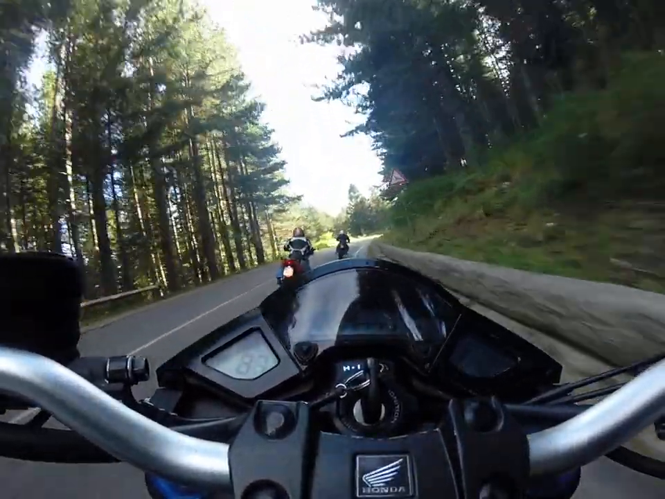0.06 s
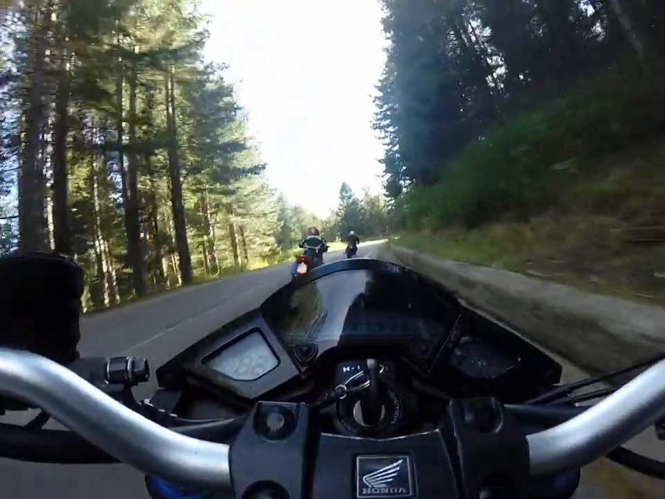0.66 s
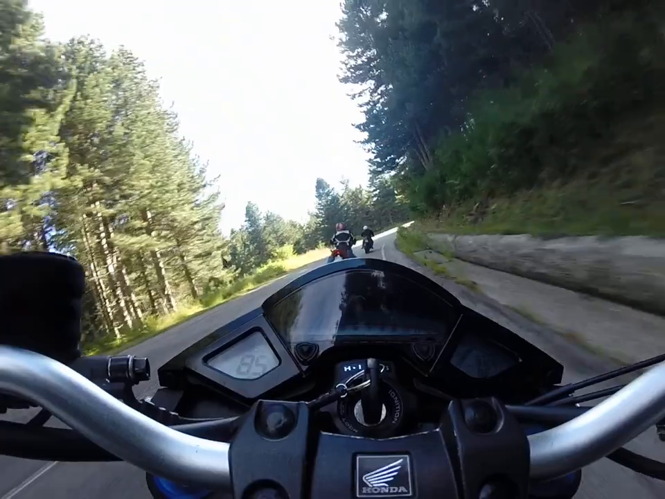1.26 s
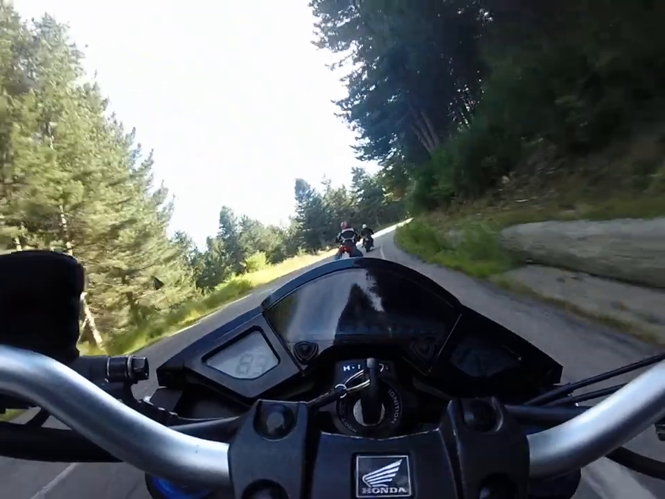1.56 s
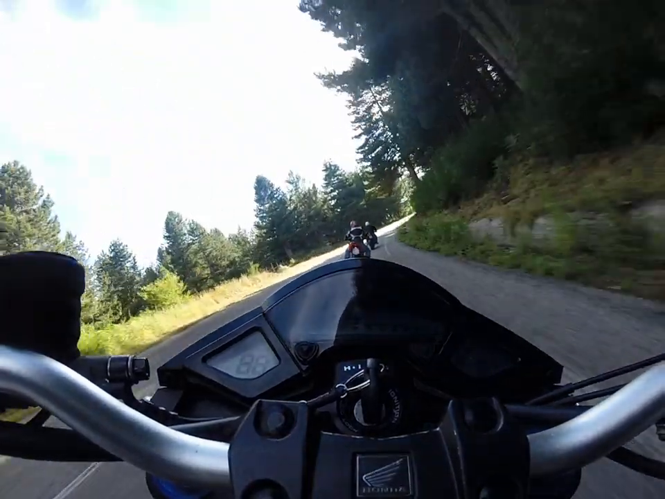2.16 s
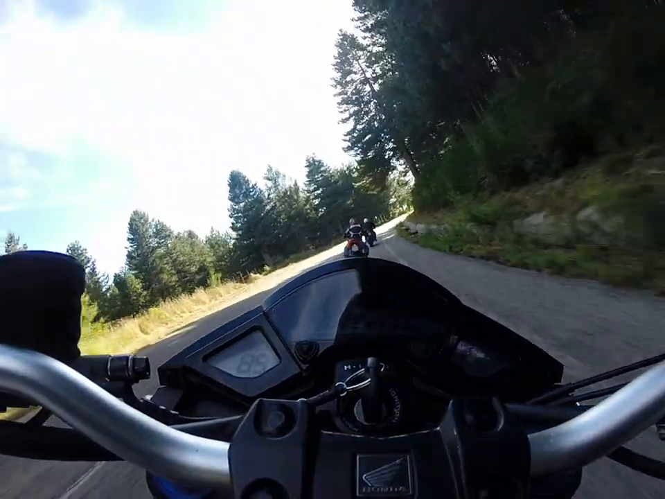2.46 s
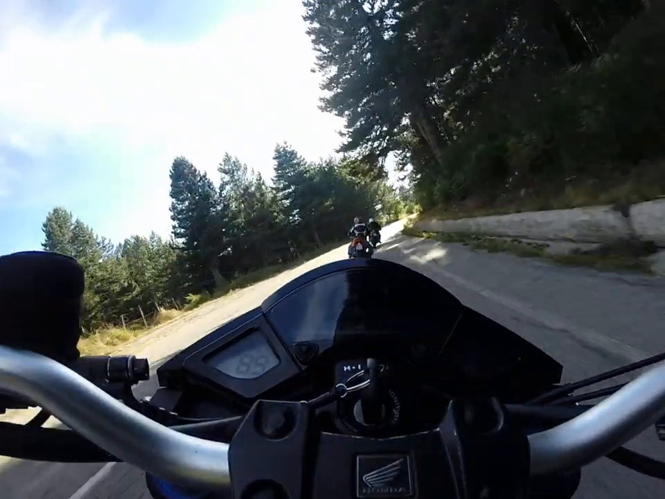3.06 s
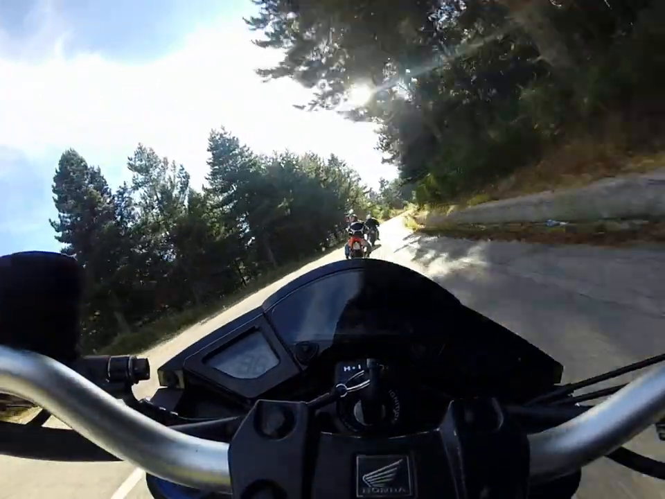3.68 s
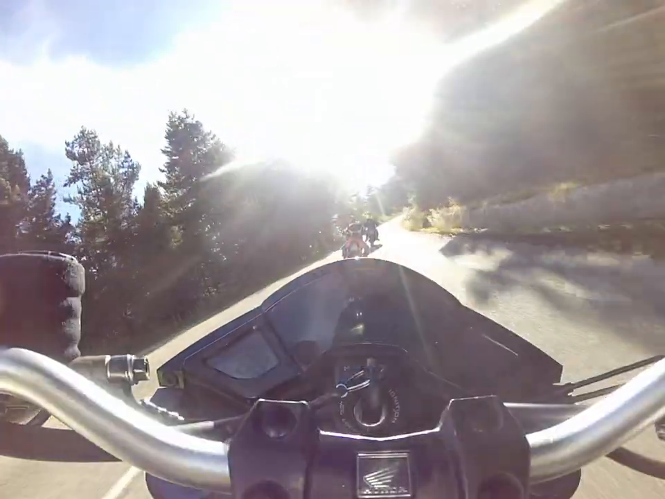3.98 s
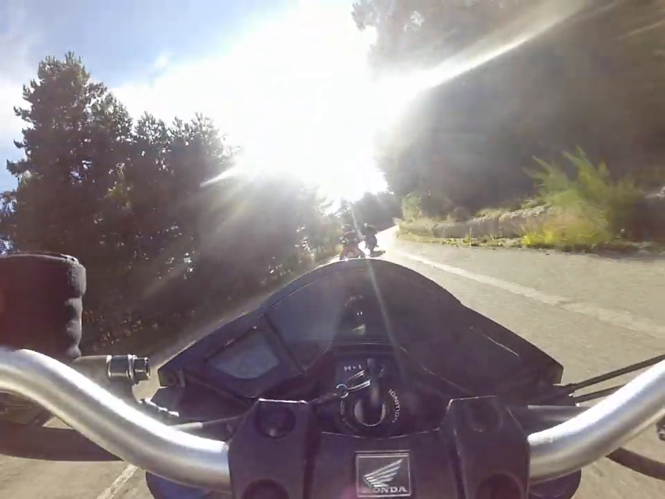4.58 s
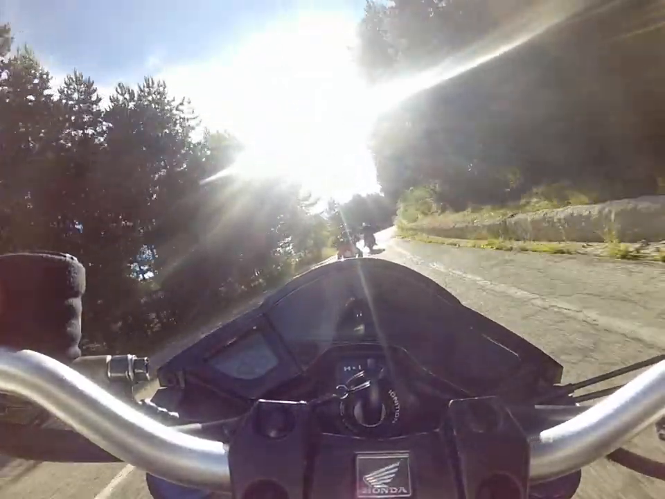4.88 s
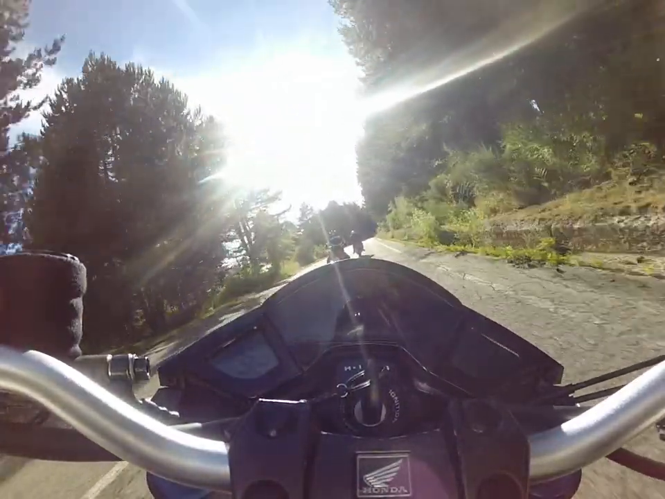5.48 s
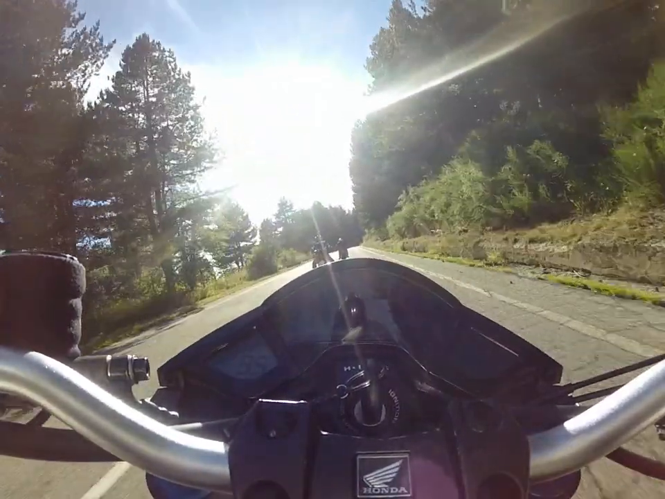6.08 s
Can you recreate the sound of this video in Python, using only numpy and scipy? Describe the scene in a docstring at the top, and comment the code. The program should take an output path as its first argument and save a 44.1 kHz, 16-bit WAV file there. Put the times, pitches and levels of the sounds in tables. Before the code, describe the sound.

A four-cylinder motorcycle runs along a mountain road throughout, heard close from just behind the handlebars. Its strong, booming drone carries a mechanical rasp and brief thin whines. The pitch dips slightly at the start, climbs slowly until about 2.5 seconds and holds, loud and full. It sags around 4.2 seconds, then climbs again to the end, with more throb and a few quick dips in loudness. The rasp swells near 0.4, 2.5, 3.7 and 5 seconds. Wind buffets the microphone with low thumps and a rough hiss, strongest around 0.3 to 0.7, 1.6, 2.5, 4.2 to 4.6 and 6 seconds. From about 3.6 seconds a second motorcycle ahead adds a faint, higher, rising note. Very faint dry ticks come near 3.7 and 5.5 seconds. At about 5.9 seconds a bump makes the plastic fairing knock once, and the engine briefly ducks before swelling back.

```python
"""A four-cylinder motorcycle climbs a mountain road, heard from just behind the handlebars.
The airbox booms at the firing rate; uneven cylinders, exhaust, valve gear and drive add a rasp.
Wind buffets the microphone, a second bike pulls away ahead, and a bump makes the fairing knock."""
import sys
import numpy as np
from scipy.fft import rfft, irfft, next_fast_len
from scipy.io import wavfile
from scipy.ndimage import uniform_filter1d, minimum_filter1d, map_coordinates

SR = 44100
rng = np.random.default_rng(int(sys.argv[2]) if len(sys.argv) > 2 else 0)


def wrap_up_sound(samples):
    """Save the sound to the file named by the first command line argument, as 16-bit audio."""
    columns = np.atleast_2d(samples).T
    # keep every value between -1 and 1, then stretch to whole-number steps
    tamed = np.clip(columns, -1, 1)
    steps = np.round(tamed * 32767).astype(np.int16)
    wavfile.write(sys.argv[1], SR, steps)


N = 279594

# Each row: centre in seconds, half length in seconds, depth in dB.
BOOM_DIPS = [(.215, 0.088, 5.5), (.54, 0.023, 3.5), (1.45, 0.15, 3), (2.65, 0.33, 1.5), (4.49, 0.031, 9),
             (4.86, 0.13, 2.5), (5.33, .07, 2.5), (5.875, 0.027, 5), (5.97, 0.04, 10.5), (6.07, 0.082, 8)]
# Each row: centre in seconds, half length in seconds, bend in Hz.
BOOM_BENDS = [(.205, .05, -7.5), (.68, .05, 6.5), (4.15, 0.061, -5), (4.44, .04, 7.5), (4.5, .04, -4)]
# Each row: time in seconds, level between surges in dB.
THROB_LEVELS = [(.08, -50), (.25, -31), (1.1, -36.5), (2.0, -33.5), (2.5, -42.5), (3.7, -44.5), (4.15, -33),
                (4.6, -37.5), (4.85, -27.5), (6.2, -26.5)]


def airbox(firings, firing_hz, surge_db, gust_db):
    """One near-pure swing per firing, loudest at resonance; unequal cylinders throb at 3/4 the rate."""
    resonance_hz, peak_db = 208.5, -9.5
    below_db_per_hz, above_db_per_hz = 0.09, 0.35
    detune_hz = firing_hz - resonance_hz
    loss_db = np.maximum(-below_db_per_hz * detune_hz, above_db_per_hz * detune_hz)
    boom_db = peak_db - loss_db - swells(BOOM_DIPS)
    shiver_db = amp(gust_db - 6.5) * wobble(35)  # gusts shake the note
    bend_turns = np.cumsum(swells(BOOM_BENDS)) / SR
    boom = np.sqrt(2) * np.sin(2 * np.pi * (firings + bend_turns))
    octave = amp(-26) * tone(2 * firings, waver_db=3.5, smear_rad=0.46, wander_hz=7.4)
    throb_db = curves(THROB_LEVELS)[0] + 1.2 * surge_db
    throb = amp(throb_db) * tone(firings * 3 / 4, waver_db=3.5, smear_rad=0.3, wander_hz=9)
    return amp(boom_db + shiver_db) * (boom + octave) + throb


# Each row: multiple of the firing rate, relative level in dB.
EXHAUST_TONES = [(1.25, 0), (1.5, -3), (1.75, -5), (2.5, -3.5), (2.75, -6), (3, -0.5), (3.25, -13),
                 (3.5, -5)]
# Each row: frequency in Hz, gain in dB.
SILENCER_RESPONSE = [(250, 0), (400, 0), (520, -5.5), (610, 0.5), (660, 7), (700, -2.5), (780, -13.5)]


def exhaust(firings, surge_db):
    """Overtones of the four-firing cycle swell as they pass through the silencer's resonance."""
    tones = sum(amp(db) * tone(multiple * firings, waver_db=2.5, smear_rad=0.23, wander_hz=12)
                for multiple, db in EXHAUST_TONES)
    level_db = climb(-44, db_per_s=0.24) + 1.4 * surge_db
    return amp(level_db) * filtered(tones, lambda hz: gain_at(SILENCER_RESPONSE, hz))


# Each row: frequency in Hz, relative level in dB.
CASING_SPECTRUM = [(450, -6.5), (680, -12.5), (820, -10.5), (1200, -11), (1350, -0.5), (1560, 0),
                   (1650, -6.5), (1750, -2), (1950, -3), (2150, -15), (2500, -10.5), (3600, -29),
                   (5000, -24.5), (13000, -67.5)]


def casing(firings, surge_db):
    """Valve gear rings the casing on overtones of the cycle, most on those of crank and firing."""
    cycles = firings / 4
    overtones = np.zeros(N)
    for k in range(9, 52):
        accent_db = 3.5 * (k % 2 == 0) + 1.1 * (k % 4 == 0)
        overtones += amp(accent_db) * tone(k * cycles, waver_db=5, smear_rad=0.48, wander_hz=5)
    beat = 1 + 0.52 * np.cos(2 * np.pi * cycles) + 0.48 * np.cos(4 * np.pi * cycles)
    clatter = amp(-4.5) * unit(beat * noise(CASING_SPECTRUM))
    level_db = climb(-40.5, db_per_s=0.5) + surge_db
    return amp(level_db) * (coloured(overtones, CASING_SPECTRUM) + clatter)


# Each row: centre in seconds, half length in seconds, multiple of the firing rate, peak in dB.
CRANK_WHINES = [(0.302, 0.39, 7.5, -38.5), (0.996, 0.37, 2, -32.5), (1.1, 0.4, 8, -38.5),
                (2.49, 0.21, 3, -32), (3.302, .35, 3, -34.5), (3.396, 0.83, 8.5, -42.5),
                (3.73, 0.12, 3, -30), (5.6, 0.48, 9, -42)]


def whines(firings):
    """Single overtones of the crank stand out of the rasp for a moment."""
    out, t = np.zeros(N), np.arange(N) / SR
    edge_drop_db = 13
    for centre_s, half_s, multiple, peak_db in CRANK_WHINES:
        level_db = peak_db - edge_drop_db * ((t - centre_s) / half_s) ** 2
        out += amp(level_db) * tone(multiple * firings, waver_db=2, smear_rad=0.44, wander_hz=14)
    return out


# Each row: multiple of the firing rate, relative level in dB.
DRIVE_TONES = [(.315, -27.5), (2.62, -50.5), (5.3, -51.5)]


def drive(firings, surge_db):
    """Clutch and chain hum in step with the crank, louder as they pull."""
    hum = sum(amp(db) * tone(multiple * firings, waver_db=2.5, smear_rad=0.87, wander_hz=7)
              for multiple, db in DRIVE_TONES)
    level_db = climb(-8, db_per_s=1.66) + 0.28 * surge_db
    return amp(level_db) * hum


# Each row: frequency in Hz, relative level in dB.
BUFFET_SPECTRUM = [(10, -13.5), (43, 3), (60, -8), (85, -18.5), (200, -30), (2000, -120)]
CHURN_SPECTRUM = [(60, -4.5), (150, -4), (270, 3), (380, -7.5), (620, -8), (800, -21), (5000, -88.5)]
HISS_SPECTRUM = [(400, -8.5), (650, -8), (850, -10), (1150, -9), (1450, 2), (1850, -3), (2200, -6.5),
                 (3000, -11), (3800, -22.5), (4950, -17), (5300, -21), (6300, -25), (8300, -36),
                 (13000, -47)]


def wind(surge_db, gust_db):
    """Gusts thump the microphone, churn around the fairing and hiss over its edges."""
    eddies = noise(BUFFET_SPECTRUM)
    buffet = amp(-26.5 + gust_db) * eddies
    hiss_db = climb(-44, db_per_s=0.92) + 0.7 * surge_db + 0.36 * gust_db
    churn_db = -29.5 + 0.16 * (gust_db - gust_db.mean()) + 0.5 * (hiss_db - hiss_db.mean())
    churn = amp(churn_db + 2.6 * wobble(18)) * noise(CHURN_SPECTRUM)
    flutter = unit(amp(0.34 * eddies + 0.83 * wobble(90)))  # eddies roughen the hiss
    hiss = amp(hiss_db) * flutter * noise(HISS_SPECTRUM)
    return buffet + churn + hiss


# Each row: time in seconds, pitch in Hz, level in dB.
BIKE_AHEAD = [(3.4, 409, -52.5), (3.75, 415.8, -29.5), (4, 423.4, -43), (4.5, 447, -37), (5, 463, -36),
              (5.5, 489, -39), (6.1, 509, -38.5)]


def bike_ahead():
    """A higher-revving engine, of which only the firing tone carries."""
    hz, db = curves(BIKE_AHEAD)
    return amp(db) * tone(np.cumsum(hz) / SR, waver_db=4.5, smear_rad=0.2, wander_hz=13)


# Each row: start in seconds, level in dB, ring frequency in Hz, T60 in seconds.
FAIRING_MODES = [(5.919, -14.5, 2200, 0.016), (5.919, -10.5, 1560, 0.0078), (5.931, -19, 1096, 0.026),
                 (5.934, -22.5, 835, 0.021), (5.937, -9, 102, 0.025)]


def fairing_knock():
    """A bump sets the plastic fairing ringing briefly."""
    out, t = np.zeros(N + SR), np.arange(SR // 10) / SR
    attack = 1 - np.exp(-t / 0.00024)
    for start_s, db, hz, t60_s in FAIRING_MODES:
        ring = amp(db - 60 * t / t60_s) * np.sin(2 * np.pi * hz * t)
        out[round(start_s * SR):][:len(t)] += attack * ring
    return out[:N]


# Each row: start in seconds, length in seconds, typical tick peak in dB.
TICK_SPELLS = [(3.645, .06, -55), (3.724, .08, -61.5), (5.176, .03, -50.5), (5.493, .2, -59)]


def ticking():
    """Faint, dry, high ticks come in short spells."""
    ticks_per_s, scatter_db, t60_s = 110, 1, 0.016
    envelope, t = np.zeros(N + SR), np.arange(SR // 10) / SR
    for start_s, length_s, db in TICK_SPELLS:
        gaps_s = rng.exponential(1 / ticks_per_s, size=40)
        peaks_db = rng.normal(db, scatter_db, size=40)
        for delay_s, peak_db in zip(np.cumsum(gaps_s) - gaps_s[0], peaks_db):
            if delay_s < length_s:
                envelope[round((start_s + delay_s) * SR):][:len(t)] += amp(peak_db - 60 * t / t60_s)
    return envelope[:N] * noise([(8000, -22), (9800, -3.5), (12500, -12.5), (14000, -16)])


def amp(db):
    """Decibels to gain."""
    return 10 ** (np.asarray(db) / 20)


def unit(x):
    """Scale to rms 1."""
    return x / np.sqrt(np.mean(x ** 2) + 1e-20)


def gain_at(spectrum, hz):
    """Gain from (Hz, dB) points on a log frequency axis."""
    points_hz, db = np.transpose(spectrum)
    return amp(np.interp(np.log(hz + 1), np.log(points_hz + 1), db))


def curves(rows):
    """One value per sample for each column after the time."""
    times_s, *columns = np.transpose(rows)
    return [np.interp(np.arange(N) / SR, times_s, column) for column in columns]


def swells(rows):
    """Sum of raised-cosine humps, one per row."""
    t = np.arange(N) / SR
    return sum(height * np.cos(np.pi / 2 * np.clip((t - centre_s) / half_s, -1, 1)) ** 2
               for centre_s, half_s, height in rows)


def climb(start_db, db_per_s):
    """A level that grows steadily as the bike gathers pace."""
    return start_db + db_per_s * np.arange(N) / SR


def wobble(knots_per_s):
    """A smooth random curve."""
    grid = np.linspace(0, N, 2000)
    knots = rng.standard_normal(1000)
    spline = map_coordinates(knots, [grid * knots_per_s / SR], mode="mirror")
    return np.interp(np.arange(N), grid, spline)


def tone(turns, waver_db, smear_rad, wander_hz):
    """A partial of rms 1 whose level and phase wander."""
    phase = 2 * np.pi * (turns + rng.random()) + smear_rad * wobble(wander_hz)
    return unit(amp(waver_db * wobble(wander_hz)) * np.sin(phase))


def filtered(x, response):
    """Zero-phase filter with gain response(hz)."""
    size = next_fast_len(N + SR // 4)
    hz = np.fft.rfftfreq(size, 1 / SR)
    return irfft(rfft(x, size) * response(hz), size)[:N]


def coloured(x, spectrum):
    """x shaped by (Hz, dB) points, at rms 1."""
    return unit(filtered(x, lambda hz: gain_at(spectrum, hz)))


def noise(spectrum):
    """Coloured noise at rms 1."""
    return coloured(rng.standard_normal(N), spectrum)


# Each row: time in seconds, firing rate in Hz.
FIRING_RATES = [(0.04, 196), (0.21, 188.7), (0.49, 188.7), (1.0, 194), (1.6, 200.1), (2.51, 206.2),
                (3.69, 206.6), (4.16, 198.4), (4.51, 205.1), (4.99, 211.8), (5.6, 215.9), (6.28, 222.6)]
# Each row: centre in seconds, half length in seconds, casing swell in dB.
# Negative where rasp and hiss briefly duck after the knock.
LEVEL_SURGES = [(.36, .3, 5.5), (1.12, 0.29, 3.5), (1.58, .2, 1), (2.47, 0.14, 5), (3.15, 0.39, 1.5),
                (3.72, 0.31, 4.5), (4.35, 0.56, 1.5), (4.92, 0.19, 4.5), (5.4, 0.28, 4), (5.99, .05, -6),
                (6.26, 0.22, 5.5)]
# Each row: centre in seconds, half length in seconds, buffet rise in dB.
WIND_GUSTS = [(.29, .13, 11.5), (.65, 0.38, 10), (1.17, 0.25, 5.5), (1.59, .2, 11), (2.52, 0.24, 8),
              (3.5, .12, 5.5), (3.77, 0.096, 2), (4.2, .1, 11.5), (4.53, 0.25, 9.5), (4.95, 0.14, 4),
              (5.35, .1, 2.5), (5.93, 0.2, 7), (6.29, 0.12, 9)]


def scene():
    """One crank times the bike's tones; rasp and hiss share the same surges."""
    firing_hz = curves(FIRING_RATES)[0]
    firings = np.cumsum(firing_hz) / SR
    surge_db, gust_db = swells(LEVEL_SURGES), swells(WIND_GUSTS)
    engine = airbox(firings, firing_hz, surge_db, gust_db) + exhaust(firings, surge_db)
    gears = drive(firings, surge_db) + casing(firings, surge_db) + whines(firings)
    background = bike_ahead() + wind(surge_db, gust_db) + fairing_knock() + ticking()
    return (engine + gears + background)[None]


def record(dry):
    """Peak limiter, then a brick-wall low-pass."""
    ceiling, hold_samples, cutoff_hz = 0.8, SR // 50, 13500
    needed_gain = np.minimum(1, ceiling / (np.abs(dry[0]) + 1e-9))
    gain = uniform_filter1d(minimum_filter1d(needed_gain, hold_samples), hold_samples)
    return filtered(dry[0] * gain, lambda hz: hz < cutoff_hz)[None]


dry = scene()
out = record(dry)
wrap_up_sound(out)
```